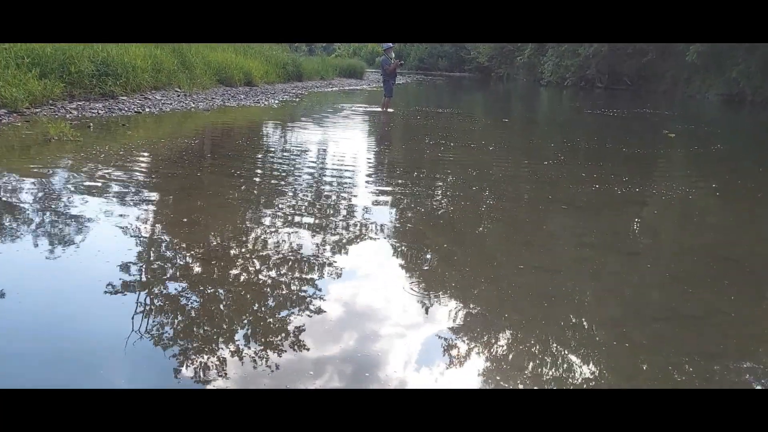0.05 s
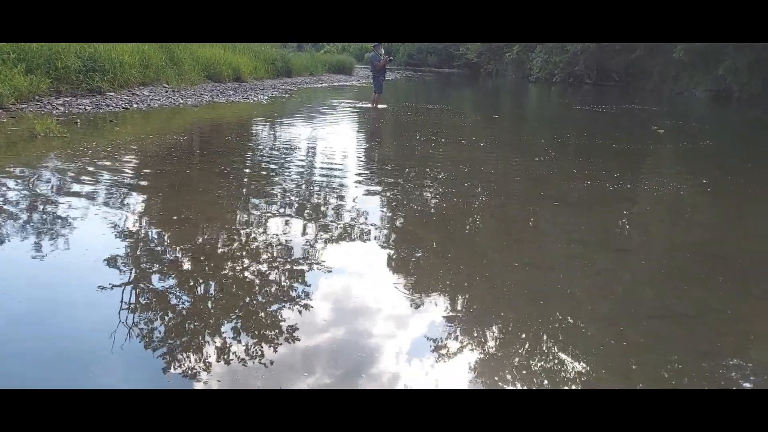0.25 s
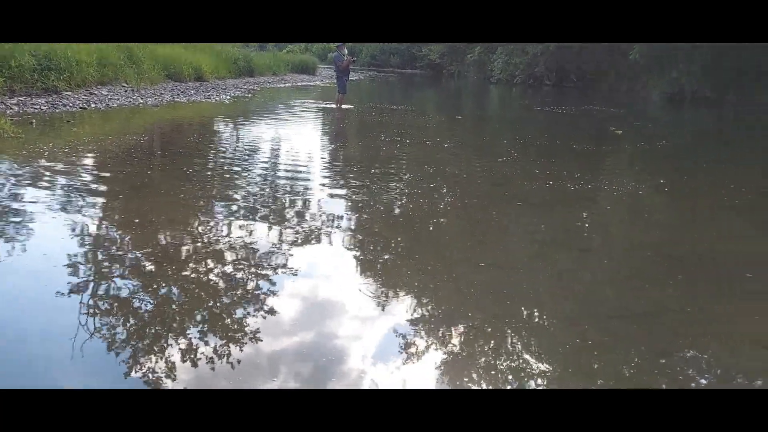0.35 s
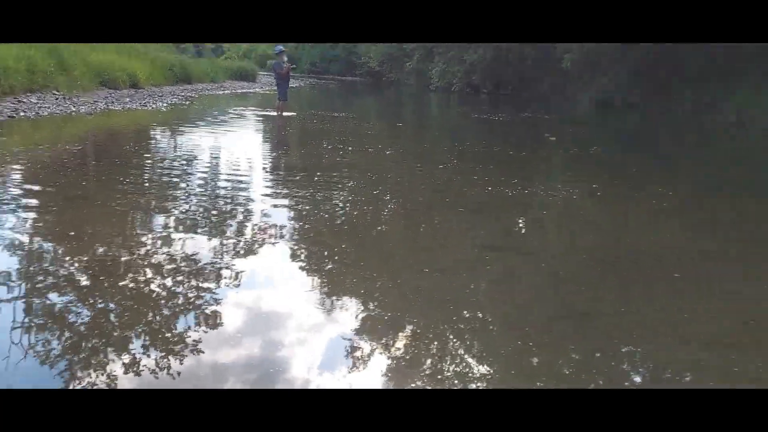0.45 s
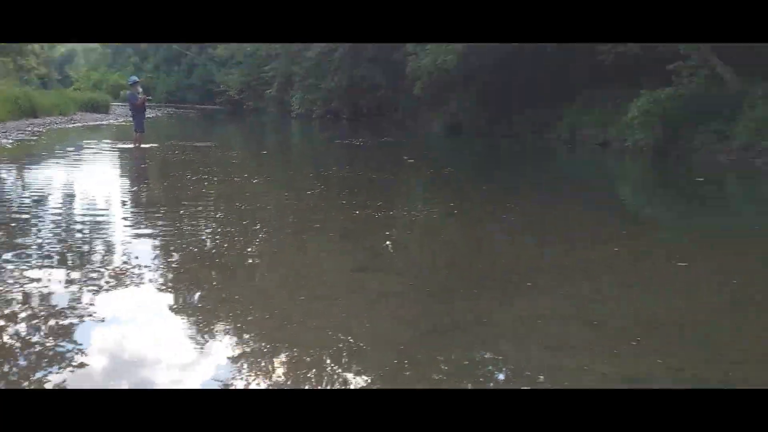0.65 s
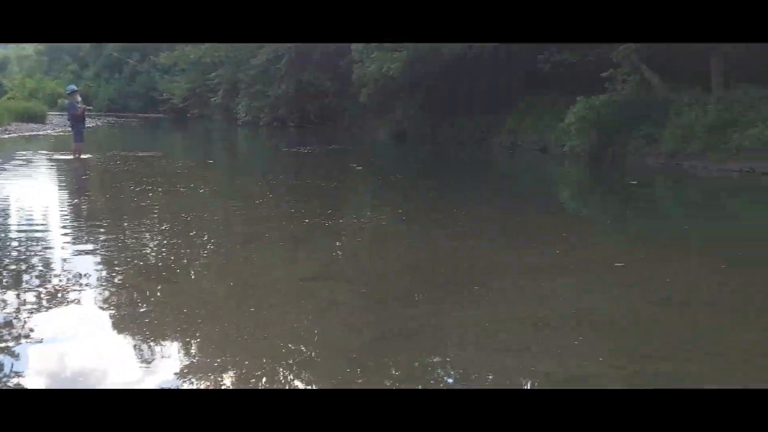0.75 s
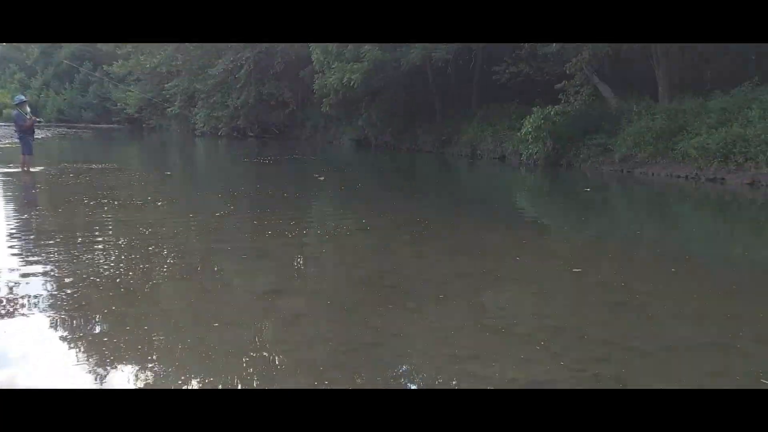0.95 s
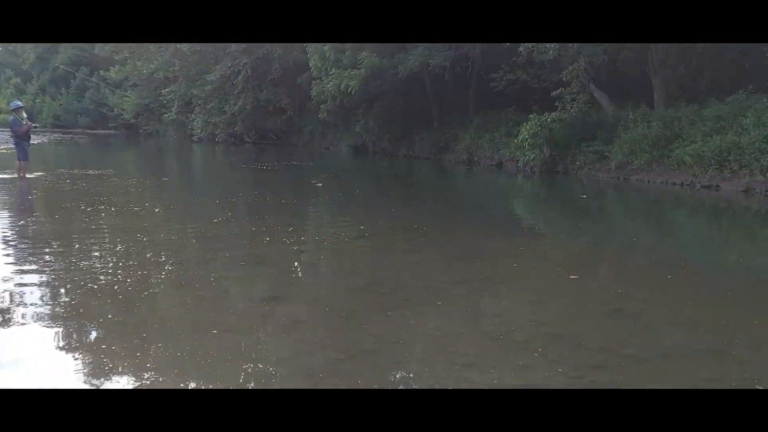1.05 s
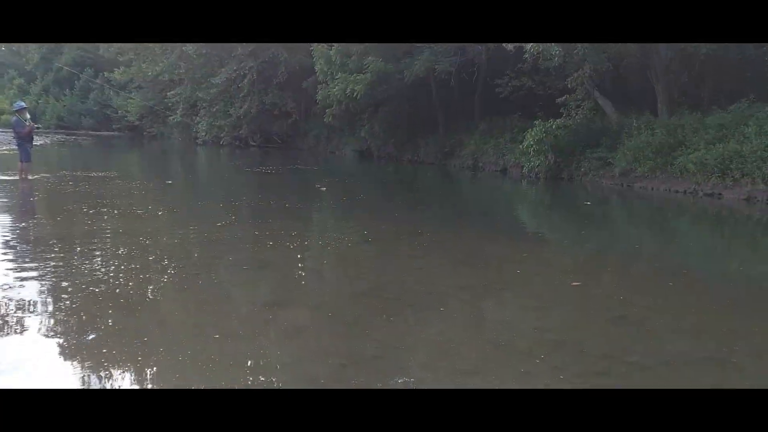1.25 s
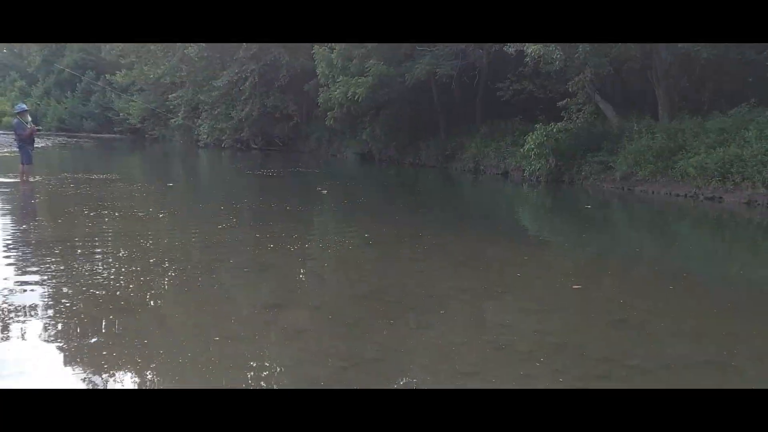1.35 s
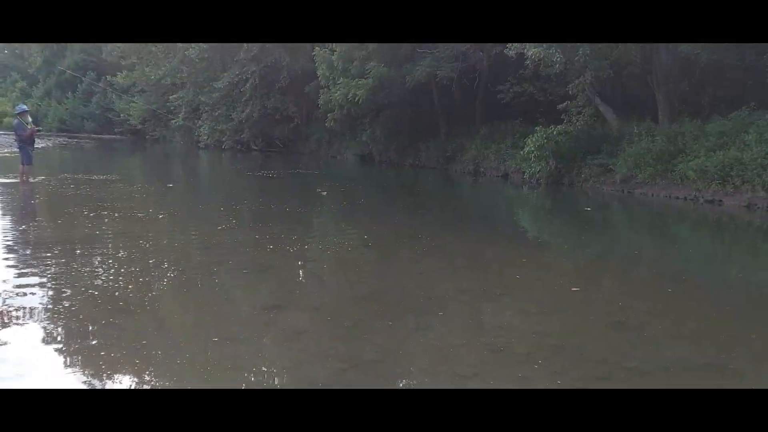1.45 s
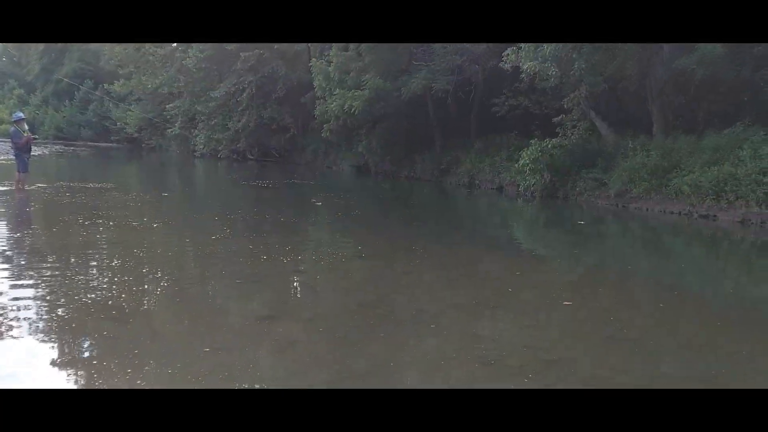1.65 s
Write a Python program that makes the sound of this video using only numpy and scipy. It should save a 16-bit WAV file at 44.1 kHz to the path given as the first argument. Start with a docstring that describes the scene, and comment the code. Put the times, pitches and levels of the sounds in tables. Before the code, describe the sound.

Water sloshes as a leg wades through a shallow creek, with faint bird chirps and a trill

```python
"""A leg sweeps through a shallow creek close by: one big slosh of bubbles, then a weak second swirl with drips.
The slosh is a random cloud of ringing bubbles plus spray noise; glugs, drips and thumps are single dying rings.
Soft low thumps reach mostly the left microphone, and the treble mostly the right. Birds whistle and trill as
gliding sines with echoes of decaying noise, over the filtered-noise hush of the creek."""
import sys
import numpy as np
from scipy import signal
from scipy.fft import rfft, irfft
from scipy.io import wavfile

SR = 44100
rng = np.random.default_rng(int(sys.argv[2]) if len(sys.argv) > 2 else 0)


def dump(signal):
    """Clip the signal to [-1, 1] and save it as 16-bit WAV at the path in sys.argv[1]."""
    limited = np.clip(np.atleast_2d(signal).T, -1, 1)
    pcm = np.round(limited * 32767).astype(np.int16)
    wavfile.write(sys.argv[1], SR, pcm)


N = 74970
T, HZ = np.arange(N) / SR, np.fft.rfftfreq(N, 1 / SR)


def amp(db):
    """Decibels to gain."""
    return 10 ** (np.asarray(db) / 20)


def unit(x):
    """Scales to an rms of one."""
    return x / np.sqrt(np.mean(x ** 2) + 1e-20)


def read(points):
    """Gains from a spectrum table on a log-frequency axis, one row for each dB column."""
    f, *columns = np.transpose(points)
    return amp([np.interp(np.log(HZ + 1), np.log(f + 1), db) for db in columns])


def sides(left_minus_right_db):
    """Left and right gains with a mean of one."""
    ratio = amp(np.atleast_1d(left_minus_right_db))
    return np.array([2 * ratio, 2 + 0 * ratio]) / (1 + ratio)


def colour(x, gain):
    """Filters by a gain for each frequency."""
    return irfft(rfft(x) * gain, N)


def below(hz, order=4):
    """Low-pass gain."""
    return 1 / (1 + (HZ / hz) ** order)


def drift(hz):
    """Slow random wander of rms one: low-passed noise."""
    return unit(colour(rng.standard_normal(N), below(hz)))


def add(mix, start_s, sound):
    """Mixes a sound in at a time."""
    part = mix[:, max(round(start_s * SR), 0):][:, :sound.shape[-1]]
    part += sound[..., :part.shape[1]]


def bubble(hz, decay_s, rise, attack_s):
    """A dying ring of peak one whose pitch glides as the bubble nears the surface (complex)."""
    t = np.arange(0, 7 * decay_s + attack_s, 1 / SR)
    env = (1 - np.exp(-(t / attack_s) ** 2)) * np.exp(-t / decay_s)
    glide_hz = hz * (1 + rise * np.minimum(t / decay_s, np.pi))
    return env / env.max() * np.exp(2j * np.pi * np.cumsum(glide_hz) / SR)


def woods(x):
    """Quick echoes from the bank and a long scatter from the trees, both as decaying noise."""
    bank_t60_s, bank_db = 0.27, -9
    trees_t60_s, trees_db, trees_build_s = 0.86, -9.5, 0.031
    side_db = -13
    near, far = rng.standard_normal((2, 2, N))
    tail = amp(bank_db) * unit(near * amp(-60 * T / bank_t60_s))
    build = 1 - np.exp(-T / trees_build_s)
    tail += amp(trees_db) * unit(far * amp(-60 * T / trees_t60_s) * build)
    mono = x.mean(0)[None]
    return sides(side_db) * signal.fftconvolve(mono, tail / np.sqrt(N), axes=1)[:, :N]


def slosh():
    """A cloud of bubbles of all sizes plus fine spray; the push of the leg sets level and depth."""
    # Push of the leg. Each row: time in seconds, level in dB before water_db.
    surge = [(0.0, -57), (0.086, -72), (0.112, -60), (0.22, -48), (0.26, -34.5), (0.27, -41),
             (0.336, -36.5), (0.35, -33.5), (0.632, -47.5), (0.662, -45), (0.744, -59), (0.926, -62.5),
             (0.958, -66), (0.974, -59), (0.992, -63), (1.046, -55), (1.3, -69.5)]
    # Spectrum of the churned water. Each row: frequency in Hz, left and right in relative dB.
    water_spectrum = [(45, -29, -33), (131, -7.5, -8.5), (310, 1, -9.5), (540, -3.5, -5.5),
                      (896, -11.5, -11), (1164, -13.5, -4), (1690, -24, -9), (2170, -29.5, -19),
                      (2960, -29.5, -20.5), (3750, -43.5, -23), (4900, -57, -29), (5080, -38, -32.5),
                      (6300, -43.5, -40), (9500, -59, -55), (10700, -56, -46.5), (15000, -61, -54)]
    water_db, spray_db, release_db_per_s = 2.5, -4.5, 66
    bubbles_per_s, size_spread_db = 3600, 1.5
    port_spread_hz = 760  # the two ports differ more with pitch, by a radian rms here
    decay_cycles, max_rise = 3.57, 0.14  # cycles at port_spread_hz, before the random spread
    deep_hz, deep_growth_db_per_db, full_db = 560, 0.11, -16

    pitches_hz = np.geomspace(150, 12000, 56)
    cloud = np.zeros((2, N))
    for hz in pitches_hz:
        rate = bubbles_per_s * np.sqrt(hz) / np.sqrt(pitches_hz).sum()
        size_db = size_spread_db * np.minimum(rng.exponential(1, N), np.pi)
        hits = (rng.random(N) < rate / SR) * amp(size_db)
        spread = np.sqrt(hz / port_spread_hz)
        decay_s = decay_cycles / hz * spread * rng.uniform(0.29, 1.66)
        one = bubble(hz, decay_s, max_rise * rng.uniform(-0.44, 1), 0.5 / hz)
        ring = signal.oaconvolve(hits, one)[:N]
        turn = np.exp(1j * rng.standard_normal() * spread)
        cloud += np.sqrt(hz) * unit(np.array([(ring * turn).imag, ring.imag]))

    spray = amp(spray_db) * rng.standard_normal((2, N))
    water = unit(colour(unit(cloud) + spray, read(water_spectrum)))
    deep = colour(water, below(deep_hz))
    push_db = np.interp(T, *np.transpose(surge))
    push_db -= release_db_per_s * np.maximum(T - surge[-1][0], 0)
    # a weaker push loses more of its deep part
    deep_gain = amp(deep_growth_db_per_db * (push_db - full_db))
    return amp(water_db + push_db) * (water - deep + deep * deep_gain)


def hush():
    """Lumpy rumble and far running water as filtered noise, under a steady narrow hiss."""
    # Far water. Each row: frequency in Hz, left and right in relative dB.
    creek_spectrum = [(20, -42, -34), (43.7, -2, -27), (111, 3, -14), (268, -7.5, -22), (445, -19, -25.5),
                      (810, -21.5, -24.5), (1120, -39, -16), (1490, -33.5, -13), (2480, -38, -24.5),
                      (2960, -45, -22), (4000, -41, -23.5), (4500, -45, -32.5)]
    # Narrow hiss. Each row: frequency in Hz, level in relative dB.
    hiss_spectrum = [(3000, -17), (5050, -20.5), (5500, -1.5), (5900, 5), (6100, -7.5), (6300, -27.5),
                     (7000, -25), (15500, -23.5)]
    creek_db, creek_top_hz = -58, 5400
    lump_db, lump_top_hz, lump_rate_hz = -3, 298, 6.4
    hiss_db, hiss_side_db = -68.5, -12.5

    creek_gain = read(creek_spectrum) * below(creek_top_hz, order=12)
    creek = unit(colour(rng.standard_normal((2, N)), creek_gain))
    low = colour(creek, below(lump_top_hz))
    creek = creek - low + low * amp(lump_db * drift(lump_rate_hz))
    hiss = unit(colour(rng.standard_normal((2, N)), read(hiss_spectrum)))
    hiss = colour(hiss, sides(hiss_side_db * below(hz=6500, order=12)))  # centred again higher up
    return amp(creek_db) * creek + amp(hiss_db) * hiss


def whistles():
    """Pure bird notes that bend through three pitches, each with its own share of woods echo."""
    # Each row: start in seconds, length in seconds, start, middle and end pitch in Hz, level in dB,
    # left minus right in dB, echo send in dB.
    notes = [(.002, 0.029, 3230, 3060, 2950, -64, -25, 9),
             (0.065, 0.041, 3930, 3470, 2700, -57.5, -37, 5.5),
             (0.1, 0.099, 7540, 7587, 7550, -67, -22, 18), (0.455, 0.025, 4010, 3723, 2960, -53, -14.5, -2),
             (.518, 0.08, 7280, 7450, 7470, -59, -10, 7.5), (0.608, 0.087, 7450, 7375, 7330, -59, -8, 2.5),
             (1.007, 0.052, 3905, 3855, 3863, -46.5, -25, 4), (1.515, 0.037, 4600, 4100, 3600, -62, -23, 4),
             (1.613, 0.036, 6930, 6440, 6150, -74, 3, 27), (1.638, 0.048, 6410, 6144, 6090, -50, -7, 4.5)]
    edge = 0.25  # share of a note spent swelling, and again fading
    waver = 0.0011  # rms pitch fraction
    out, echoed = np.zeros((2, 2, N))
    for start_s, length_s, start_hz, middle_hz, end_hz, db, side_db, echo_db in notes:
        u = np.arange(0, length_s, 1 / SR) / length_s
        bend = np.polyfit([0, 0.5, 1], [start_hz, middle_hz, end_hz], 2)
        hz = np.polyval(bend, u) * (1 + waver * drift(hz=90)[:len(u)])
        env = np.sin(np.pi / 2 * np.minimum(np.minimum(u, 1 - u) / edge, 1))
        note = amp(db) * sides(side_db) * env * np.sin(2 * np.pi * np.cumsum(hz) / SR)
        add(out, start_s, note)
        add(echoed, start_s, amp(echo_db) * note)
    return out + woods(echoed)


def thumps():
    """Dull low knocks: rings that die within a cycle or two."""
    # Each row: start in seconds, pitch in Hz, level in dB.
    knocks = [(0.011, 193.6, -50), (0.386, 140, -33), (0.418, 156, -28), (0.439, 117, -31.5),
              (0.499, 114, -40.5), (0.561, 136.5, -32.5), (.640, 123, -41.5), (.762, 143, -49.5),
              (0.796, 130, -43.5), (1.076, 142, -44), (1.131, 102.3, -40.5), (1.222, 128, -51),
              (1.440, 116, -44), (1.497, 120, -51), (1.547, 98, -50.5)]
    decay_s, side_db = 0.0054, 18.5
    out = np.zeros((2, N))
    for start_s, hz, db in knocks:
        add(out, start_s, amp(db) * sides(side_db) * bubble(hz, decay_s, 0, decay_s).imag)
    return out


def showers(count=60):
    """Drops fall back at random, strongest mid-shower, each ringing as one small gliding bubble."""
    # Each row: middle in seconds, half length in seconds, lowest and highest pitch in Hz,
    # mean level at the middle in dB, mean left minus right in dB.
    bursts = [(.14, 0.025, 550, 760, -61, 33), (.385, .14, 2480, 4010, -47, -17),
              (.35, .12, 750, 1550, -39, -9.5), (1.056, .2, 1270, 2870, -59, -26)]
    decay_cycles, mid_rise = 7, 0.047
    spread_db, edge_db = 5.5, -8.5
    out = np.zeros((2, N))
    for middle_s, half_s, low_hz, high_hz, db, side_db in bursts:
        for when, size, side, pitch, rise in rng.uniform(-1, 1, (count, 5)):
            hz = low_hz * (high_hz / low_hz) ** ((pitch + 1) / 2)
            ring = bubble(hz, decay_cycles / hz, mid_rise * (0.5 + rise), 1 / hz).imag
            gain = amp(db + spread_db * size + edge_db * when ** 2)
            add(out, middle_s + half_s * when, gain * sides(side_db + 2 * side) * ring)
    return out


def drips():
    """Glugs inside the slosh, then drips, as single rings; splats as short rings, ticks as noise bursts."""
    # Glugs and drips. Each row: start in seconds, pitch in Hz, level in dB, decay in seconds,
    # pitch rise as a fraction per decay, left minus right in dB.
    glugs = [(0.211, 333, -28.5, 0.0066, 0.17, 1.5), (.249, 490, -30.5, 0.011, 0.16, -7),
             (.257, 1278, -28.5, 0.007, 0.086, -18), (.292, 195, -27.5, 0.0031, -0.028, 0),
             (.315, 473, -24.5, 0.01, 0.025, -2.5), (0.3356, 312, -27, 0.0045, 0.036, -4),
             (0.356, 1278, -29, 0.0032, -0.019, -9), (0.359, 310, -30, 0.0057, 0.017, -17),
             (.417, 620, -27.5, 0.0017, 0.003, 28), (.563, 406, -41, 0.018, 0.04, -6),
             (0.6, 227, -34.5, 0.0053, -0.0038, 4), (.659, 600, -39.5, 0.012, 0.026, -1),
             (0.7046, 1283, -43.5, 0.0069, 0.044, -10), (.843, 1018, -50, 0.0043, 0.0061, -20),
             (.894, 2073, -57.5, 0.015, 0.051, -21), (.916, 1568, -58, 0.028, .03, -22),
             (.969, 1147, -43.5, 0.0048, 0.02, -19), (.976, 657, -50, 0.02, 0.023, -2),
             (1.009, 937, -50.5, .005, 0.015, -17), (1.036, 1214, -51.5, 0.0089, 0.034, -8),
             (1.043, 679, -50.5, 0.01, 0.085, -9), (1.083, 1630, -52, .008, 0.074, -20),
             (1.094, 570, -50, 0.017, .01, -1)]
    # Sharp splats of drops. Each row: start in seconds, pitch in Hz, level in dB, decay in seconds.
    splats = [(0.646, 3680, -35.5, 0.00082), (1.5407, 1690, -45, 0.0023), (1.5413, 870, -41.5, 0.0013)]
    # Tiny dry ticks. Each row: start in seconds, level in dB before the band filter.
    tick_rows = [(0.664, -44), (0.68, -53), (.734, -49.5), (0.755, -54), (1.402, -53)]
    glug_attack_s, splat_side_db = 0.0024, -16
    tick_decay_s, tick_hz, tick_half_width_hz = 0.00082, 10400, 7200

    out = np.zeros((2, N))
    for start_s, hz, db, decay_s, rise, side_db in glugs:
        add(out, start_s, amp(db) * sides(side_db) * bubble(hz, decay_s, rise, glug_attack_s).imag)
    for start_s, hz, db, decay_s in splats:
        add(out, start_s, amp(db) * sides(splat_side_db) * bubble(hz, decay_s, 0, decay_s / 2).imag)
    ticks = np.zeros((2, N))
    for start_s, db in tick_rows:
        add(ticks, start_s, amp(db) * np.exp(-T / tick_decay_s) * rng.standard_normal((2, N)))
    return out + colour(ticks, 1 / (1 + ((HZ - tick_hz) / tick_half_width_hz) ** 2))


def trill():
    """A fast buzzy run of tiny falling bird notes, each a little different, with a near reflection."""
    # Each row: time in seconds, level in dB.
    contour = [(1.073, -49.5), (1.1, -44), (1.16, -38.5), (1.21, -43), (1.25, -46.5), (1.33, -54.5),
               (1.39, -49), (1.492, -49), (1.503, -86)]
    notes_per_s, centre_hz, sweep_hz, jitter_hz = 104.5, 3276, 651, 44.5
    flick_hz, note_shape = 750, 1.68
    flutter_db, side_db = 0.38, -24
    reflection_s, reflection_db = 0.0048, -10

    note, cycle = np.divmod(np.maximum(T - contour[0][0], 0) * notes_per_s, 1)
    detune, phase = rng.standard_normal((N, 2))[note.astype(int)].T
    hz = centre_hz + sweep_hz * (0.5 - cycle) + jitter_hz * detune
    hz = hz + flick_hz * (1 - 2 * cycle) ** 3  # steeper at both ends of a note
    level_db = np.interp(T, *np.transpose(contour), left=-np.inf, right=-np.inf)
    level = amp(level_db + flutter_db * drift(hz=60))
    env = np.sin(np.pi * cycle) ** note_shape
    song = level * env * np.sin(2 * np.pi * (np.cumsum(hz) / SR + phase))
    direct = sides(side_db) * song
    out = direct.copy()
    add(out, reflection_s, amp(reflection_db) * direct)
    return out


def scene():
    """Water close by, birds in the trees."""
    buzz = trill()
    water = slosh() + hush() + thumps() + showers() + drips()
    return water + whistles() + buzz + woods(buzz)


def record(dry):
    """A low cut and the band limit."""
    low_cut_hz, edge_hz = 43.4, 15650
    cut = signal.sosfilt(signal.butter(2, low_cut_hz, "high", fs=SR, output="sos"), dry)
    band = signal.firwin(511, edge_hz, window=("kaiser", 9), fs=SR)
    return signal.oaconvolve(cut, band[None], "same")


dry = scene()
out = record(dry)
dump(out)
```